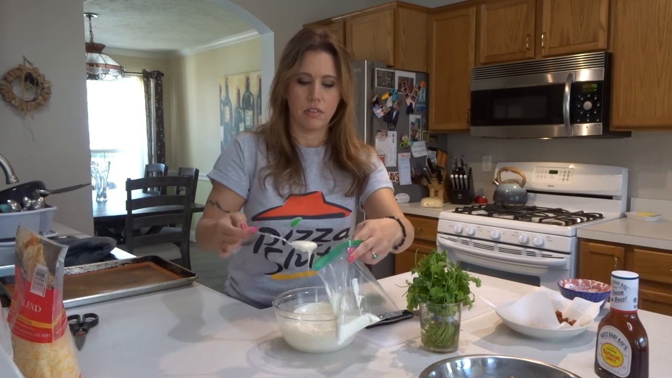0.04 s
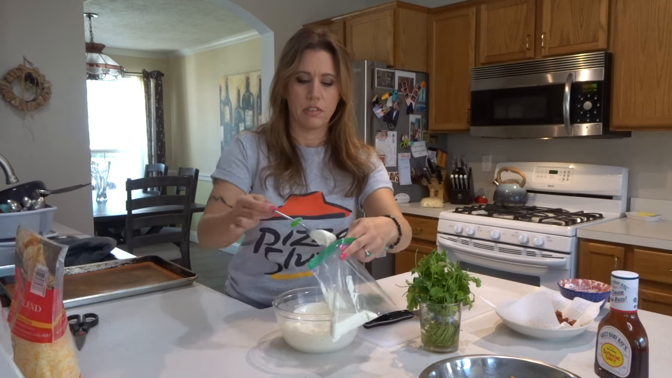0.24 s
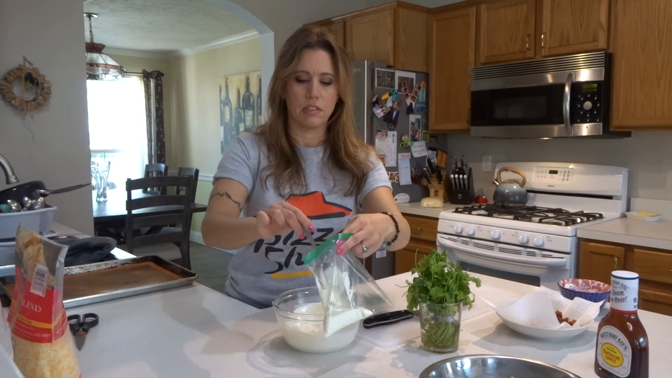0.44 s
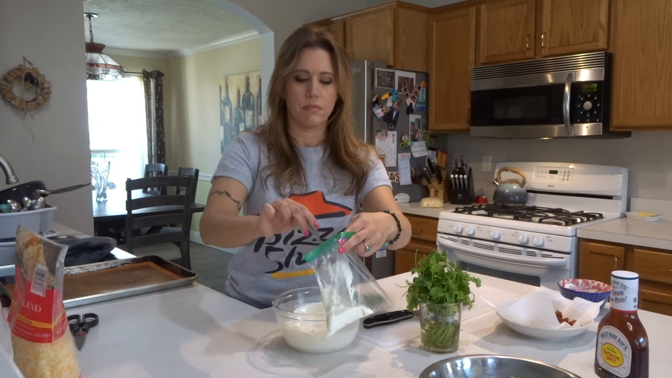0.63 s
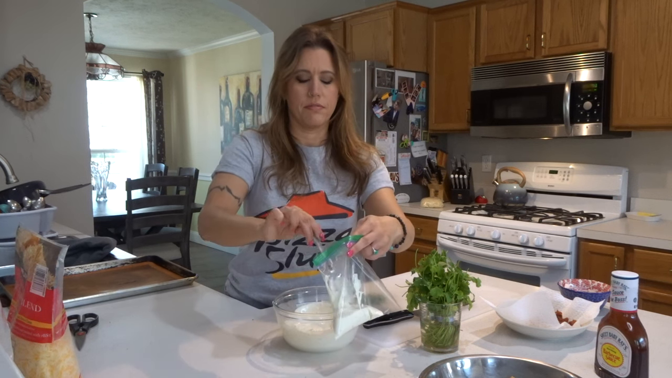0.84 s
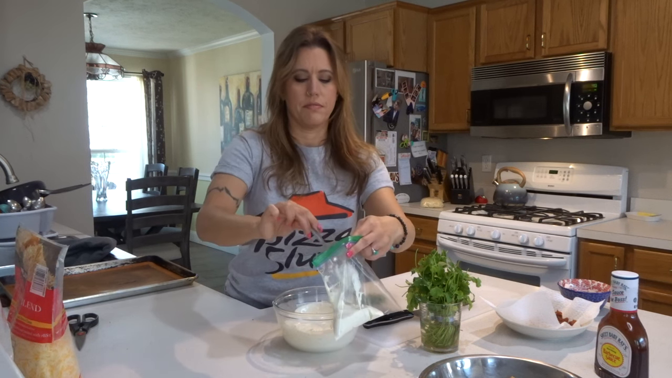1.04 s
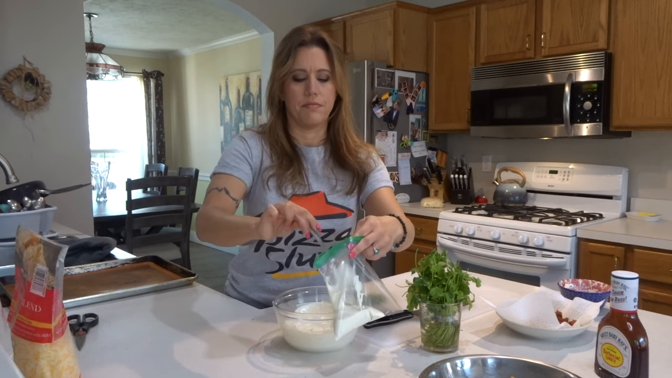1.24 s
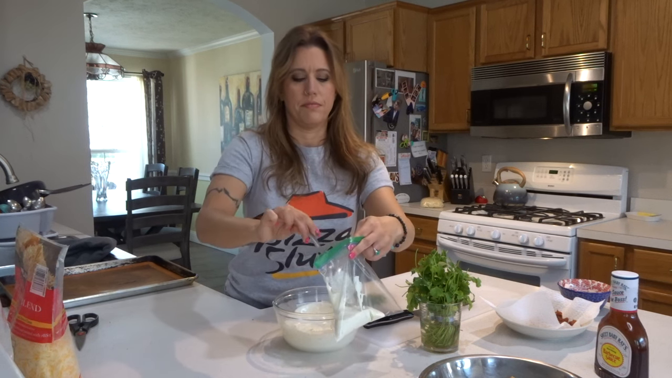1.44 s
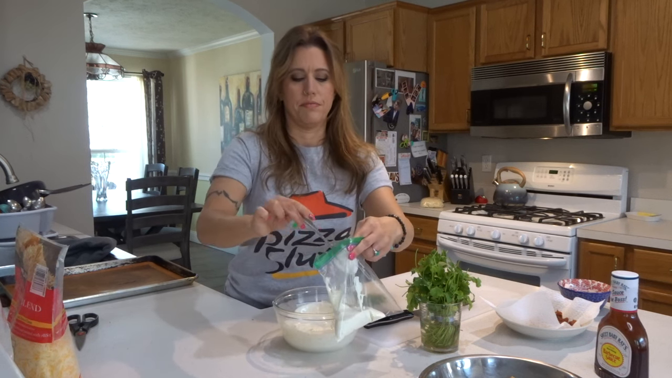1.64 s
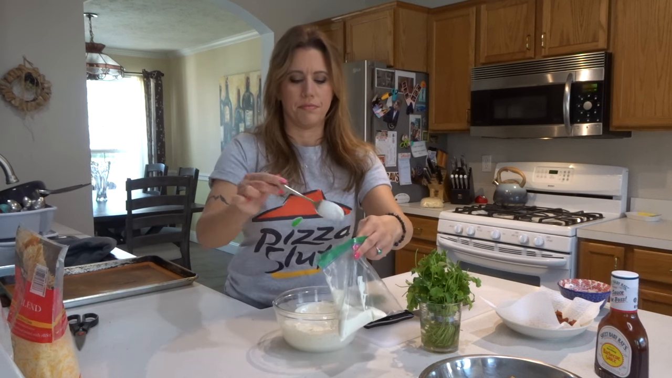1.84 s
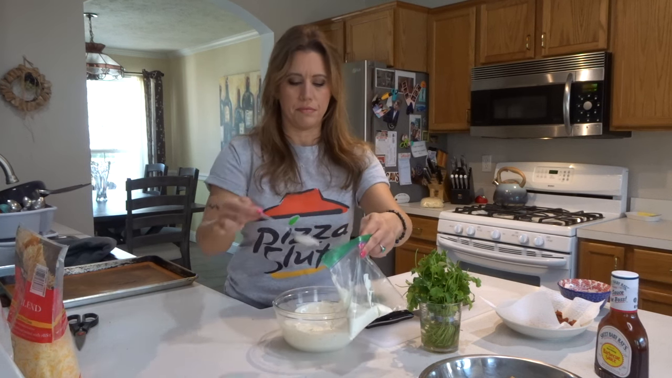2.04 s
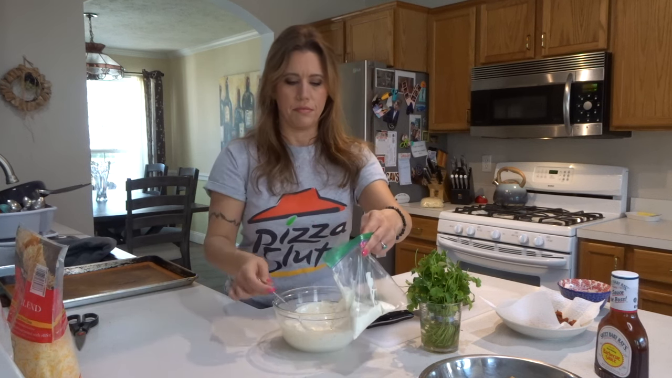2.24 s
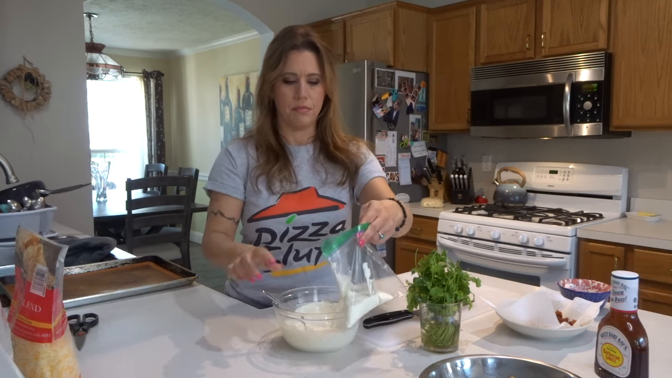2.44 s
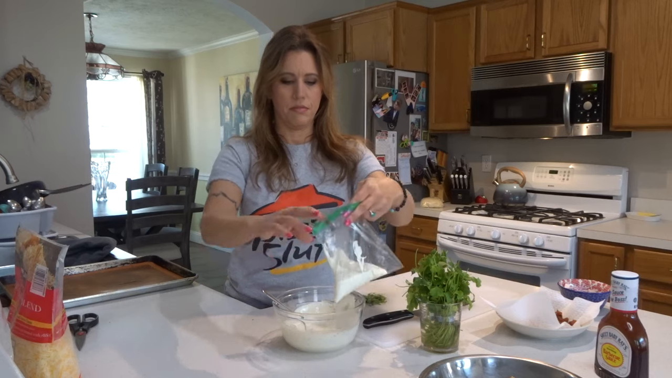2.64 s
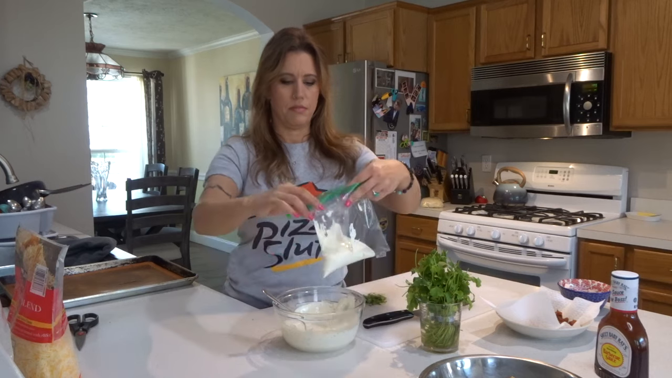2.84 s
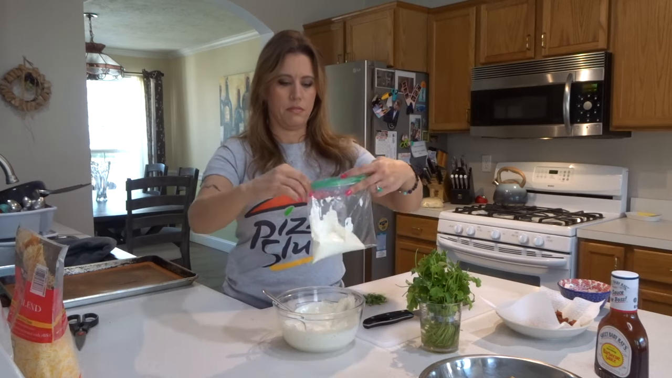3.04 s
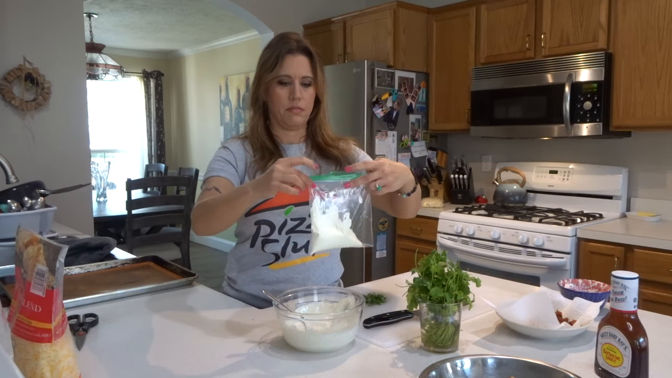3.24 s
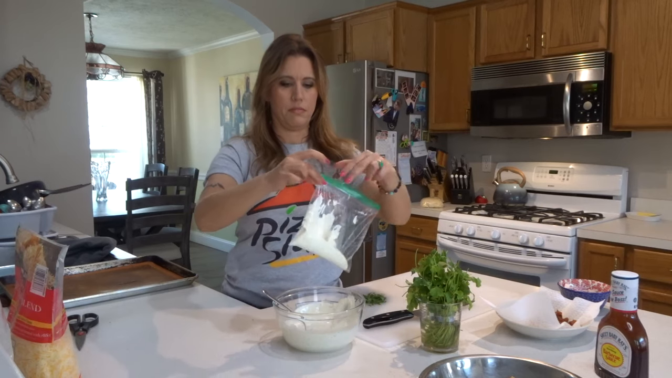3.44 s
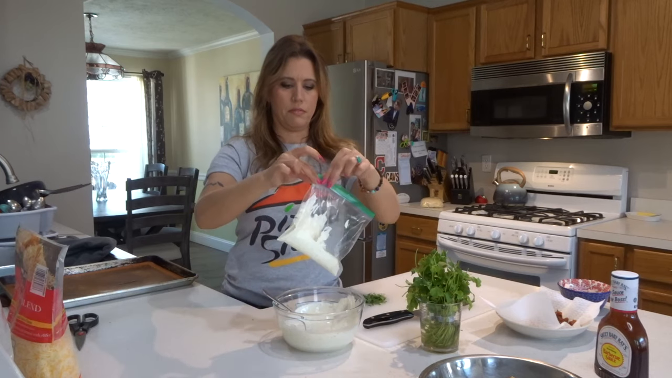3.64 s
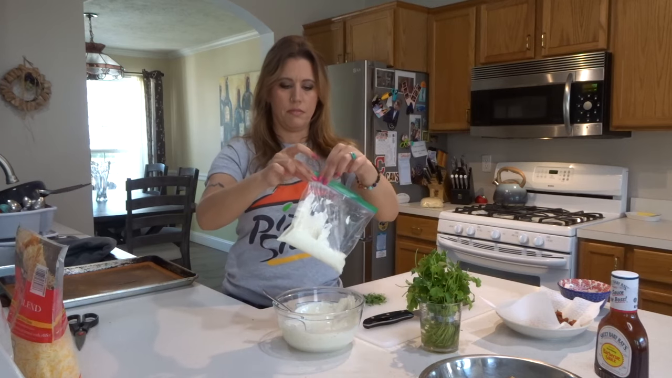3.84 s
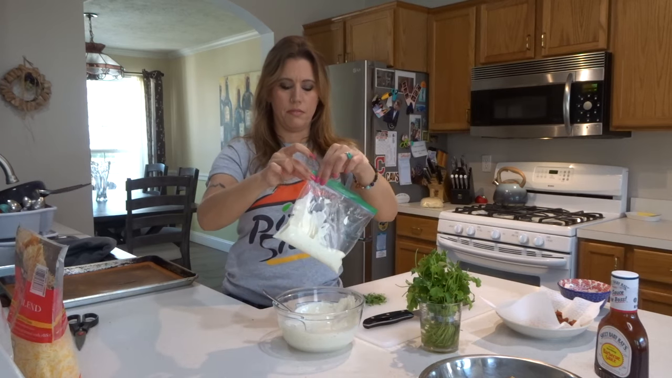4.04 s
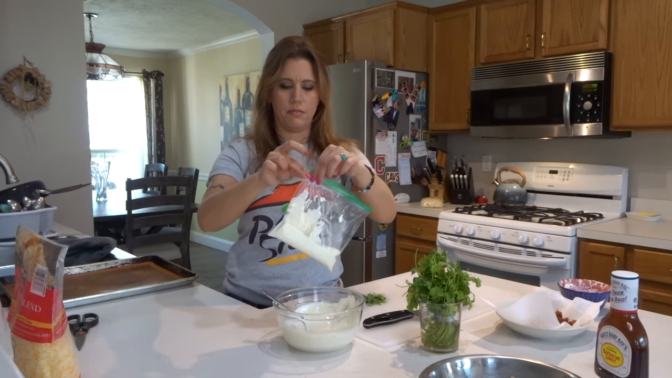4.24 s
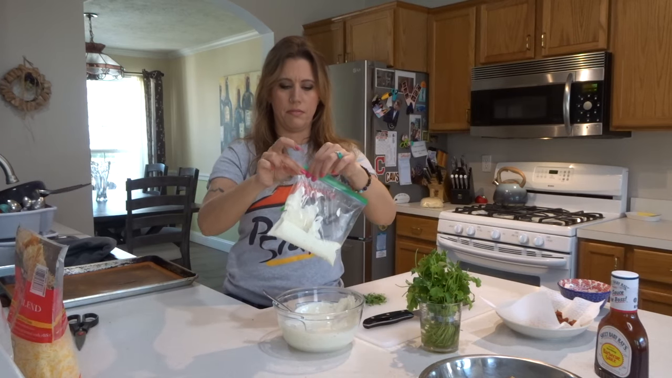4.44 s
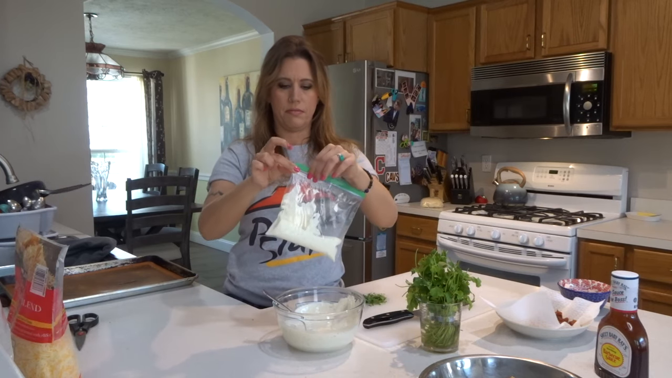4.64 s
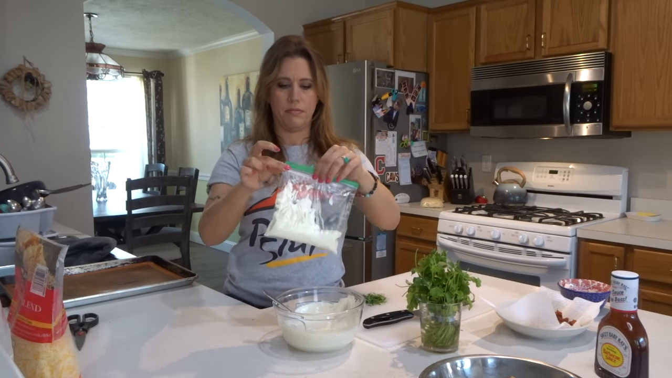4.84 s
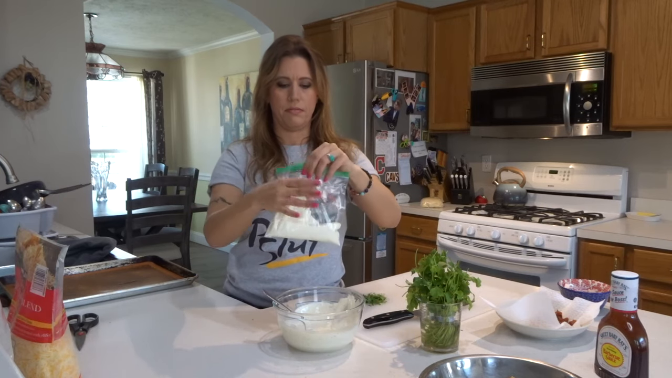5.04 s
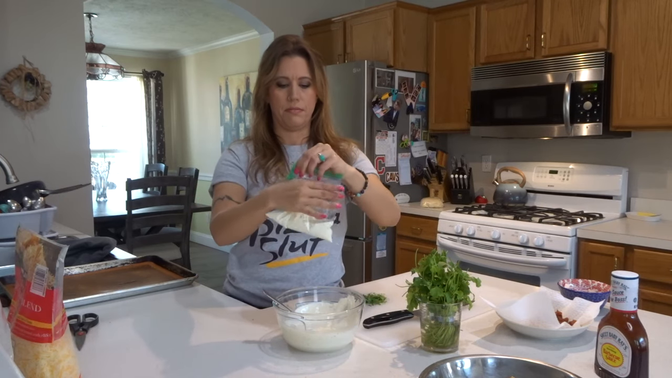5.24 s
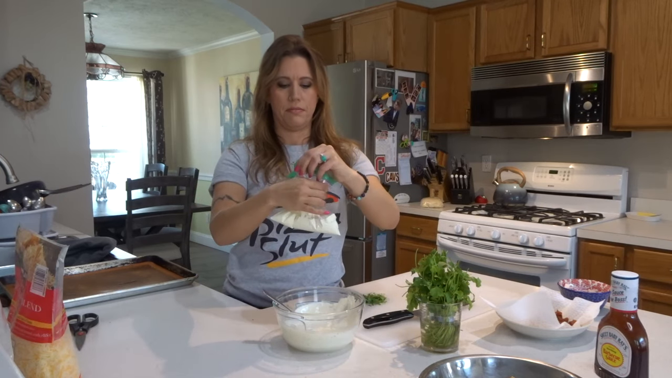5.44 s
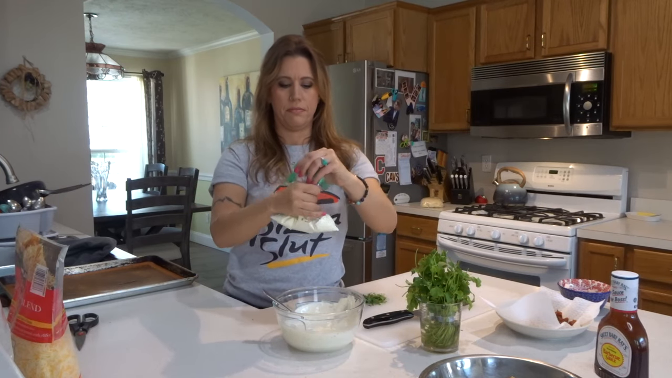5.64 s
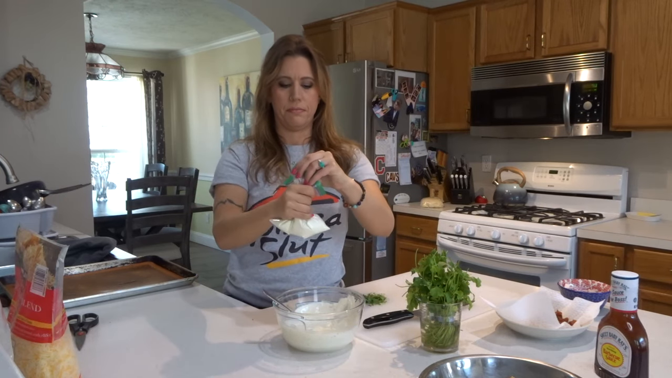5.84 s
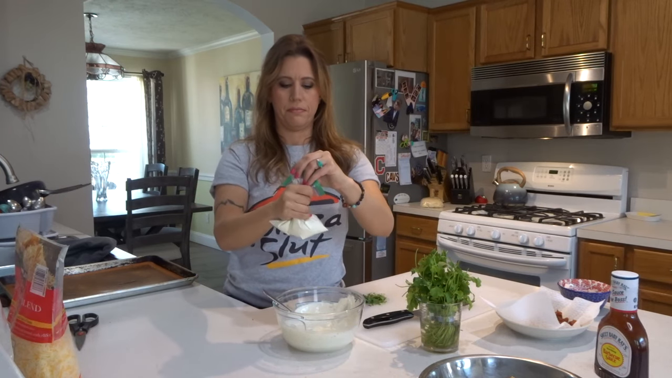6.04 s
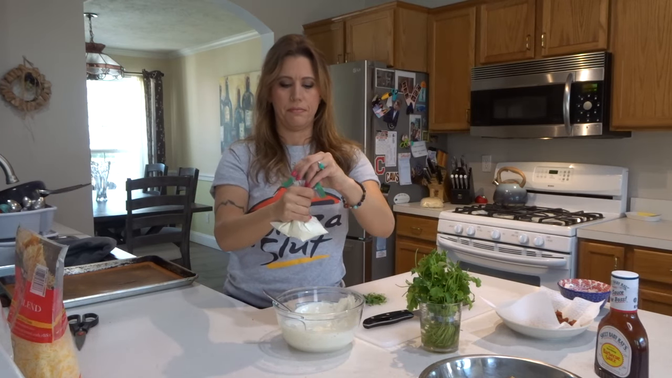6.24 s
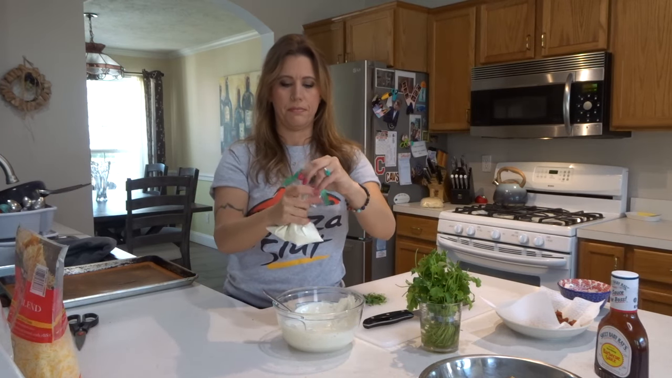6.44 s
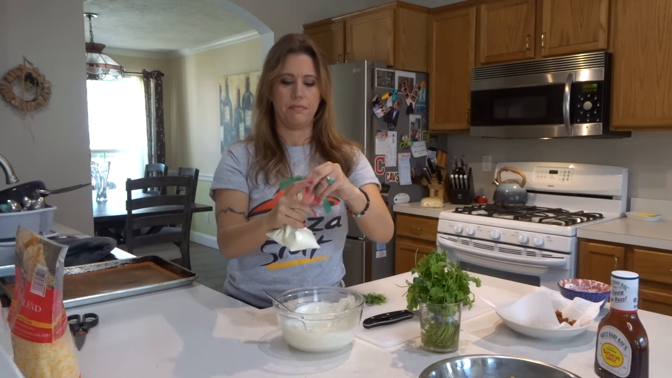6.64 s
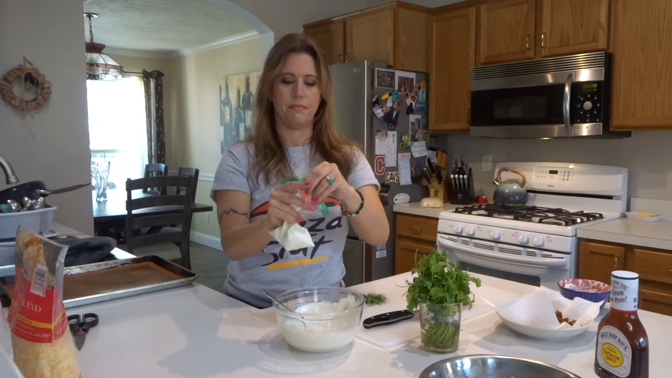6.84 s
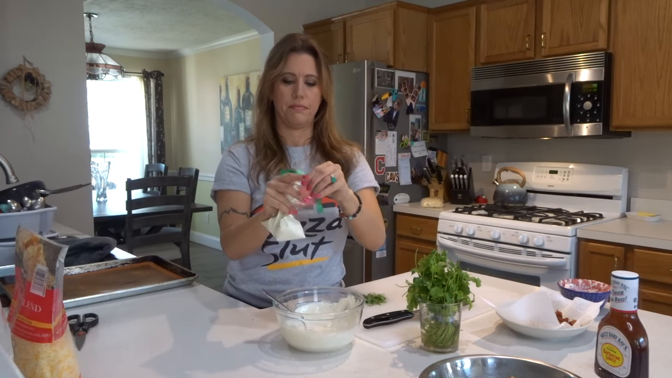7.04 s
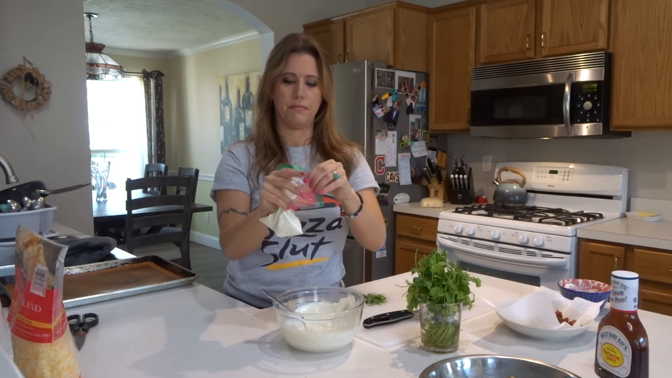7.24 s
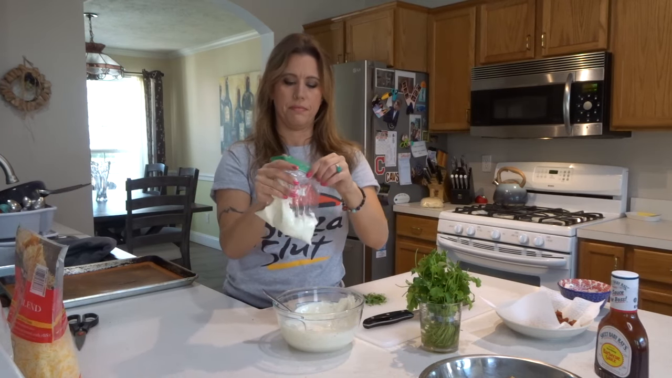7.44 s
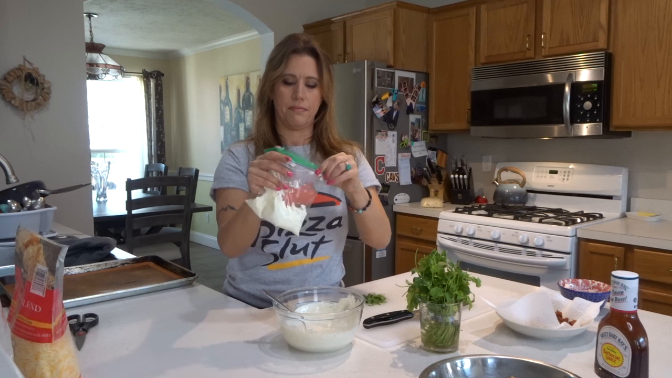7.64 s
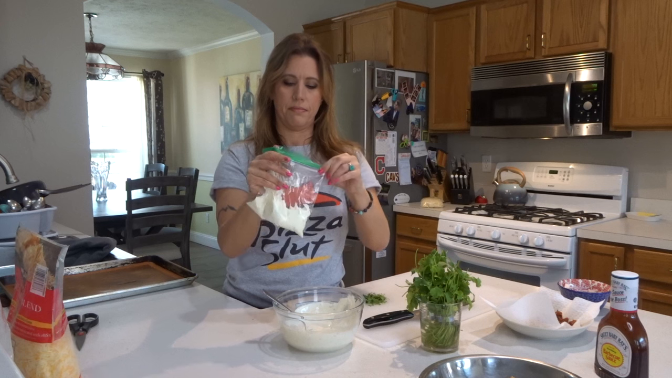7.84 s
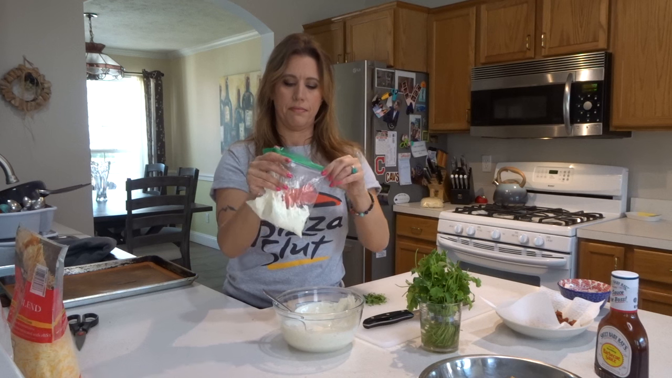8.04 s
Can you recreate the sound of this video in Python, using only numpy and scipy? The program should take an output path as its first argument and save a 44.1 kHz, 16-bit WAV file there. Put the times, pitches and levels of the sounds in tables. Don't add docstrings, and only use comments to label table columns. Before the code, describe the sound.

Quiet kitchen hum with faint plastic ticks, one bright spoon clatter, then crisp bursts of plastic bag crinkling as it is closed and squeezed.

```python
import sys
import numpy as np
from scipy import signal
from scipy.fft import rfft, irfft, next_fast_len
from scipy.io import wavfile
from scipy.ndimage import uniform_filter1d, map_coordinates

SR = 44100
rng = np.random.default_rng(int(sys.argv[2]) if len(sys.argv) > 2 else 0)


def voltage_ratio(decibels):
    exponent = np.asarray(decibels, float) / 20
    return 10 ** exponent


def unload_wav(signal):
    wavfile.write(
        sys.argv[1],
        SR,
        np.round(np.clip(np.atleast_2d(signal).T, -1, 1) * 32767).astype(np.int16),
    )


N = 357385

# start_s, peak_db, panel_hz, brightness_db
CREASE_SNAPS = [(.384, -45, 2360, -8), (.3995, -34, 2500, -19), (.4045, -38, 3300, -17),
                (.41, -37, 3000, -22), (.417, -37, 1780, -23), (.433, -42, 2700, -25),
                (.7173, -41, 2520, -2), (.854, -41, 2920, -9), (.9987, -41, 2410, -27),
                (1.03, -40.5, 2050, -27), (1.1524, -43, 1720, -18), (1.233, -40.5, 2680, -28),
                (1.8427, -41.5, 3300, -27), (3.5815, -39, 2160, -22), (3.6208, -38, 2200, -9),
                (3.7187, -32, 2310, -3), (4.0586, -43, 3510, -1), (4.148, -39, 2200, -3),
                (4.1887, -40, 3310, -19), (4.2103, -26, 4000, 0), (4.2118, -14, 3240, -1),
                (4.2165, -29.5, 1960, -15), (4.5776, -43, 2560, -21), (4.657, -44, 2500, -19),
                (4.68, -42, 3300, -24), (4.7226, -38, 3330, -33), (4.7422, -40, 3200, -19),
                (4.826, -40, 3000, -18), (4.7586, -34, 4420, -31), (4.7937, -32, 2820, -25),
                (4.8071, -35, 3230, -23), (4.937, -35, 1880, -15), (6.0175, -42.5, 5200, -10),
                (6.025, -47, 3700, -15), (6.162, -43, 2800, -27), (3.6, -37.5, 2250, -25),
                (3.64, -43, 2200, -25), (7.8228, -21, 3000, 7), (7.6336, -29, 3270, -23),
                (8.0898, -32, 3370, -14)]
# start_s, peak_db, panel_hz, brightness_db
LIFT_SNAPS = [(2.66, -28, 3300, -29), (2.7365, -30, 1900, -27), (2.761, -30, 3200, -20),
              (2.812, -28, 3000, 5), (2.8365, -28, 4960, -8), (2.9, -26, 2700, 5), (2.908, -22, 2500, -5),
              (3.241, -32, 2990, -14), (3.258, -30, 3250, -17), (2.675, -22, 3180, -15),
              (2.6912, -28.5, 1680, -20), (2.748, -11.5, 2380, -19), (2.778, -21.5, 2900, -4),
              (2.819, -19.5, 2700, -4), (2.8505, -20, 2900, -7), (2.8848, -13, 3420, -22),
              (2.8934, -13, 2070, -4), (2.983, -22, 3300, 0), (3.046, -27, 4340, -2),
              (3.112, -34, 3070, -10), (3.1815, -22, 3330, -6), (3.2724, -28, 3370, -17),
              (3.283, -30, 2800, -14), (3.3367, -34, 3820, -20), (3.55, -37, 3630, -25)]
# start_s, peak_db, panel_hz, brightness_db
FOLD_SNAPS = [(5.0141, -25.5, 2600, -5), (5.0184, -25, 1740, -9), (5.0445, -31, 3140, -4),
              (5.058, -26, 2480, -10), (5.097, -28, 2400, -11), (5.1894, -29.5, 2880, -7),
              (5.2305, -23.5, 2900, -1), (5.241, -30, 3600, -7), (5.312, -15.5, 4300, -5),
              (5.4415, -28, 6460, 1), (5.5014, -30, 4500, -8), (5.5335, -27, 5300, -8),
              (5.578, -21.5, 2980, -1), (5.589, -30, 2300, -5), (5.612, -29, 4300, -15),
              (5.624, -23, 2900, 5), (5.637, -25.5, 1980, -12), (5.71, -27.5, 4300, -4),
              (5.047, -24, 2400, 10), (5.064, -19, 2380, -16), (5.0756, -16.5, 2460, -7),
              (5.221, -22, 2590, -1), (5.315, -22, 4200, 3), (5.3367, -22.5, 3520, 16),
              (5.466, -32, 6000, 5), (5.6292, -24.5, 4300, -2), (5.214, -22.5, 3460, 1),
              (5.2485, -21.5, 3580, -5), (5.2999, -18, 4280, -11), (5.3601, -13, 2520, -4),
              (5.49, -15, 4970, -30), (5.5741, -19, 4100, -2), (5.68, -22.5, 3380, -6),
              (5.785, -28, 2800, 4)]
# start_s, peak_db, panel_hz, brightness_db
SQUEEZE_SNAPS = [(6.3766, -18.5, 3840, -1), (6.4628, -23, 3080, -2), (6.6726, -22, 5000, -8),
                 (6.709, -26, 3530, -12.5), (6.7566, -18, 2940, 7), (7.3012, -21, 3340, -11),
                 (7.3867, -17, 3380, -9), (7.4215, -13, 3800, -13), (7.532, -28, 3150, -24),
                 (6.2555, -36, 1600, 0), (6.299, -33, 3470, 5), (6.3218, -25, 3560, -3),
                 (6.33, -26, 3400, -3), (6.414, -32, 1790, -5), (6.502, -25, 3000, -18),
                 (6.516, -25, 3200, -9), (6.562, -32, 2580, -7), (6.637, -24.5, 2920, -2),
                 (6.666, -23.5, 2600, -15), (6.7, -25, 3300, -15), (6.7435, -18, 2390, -2),
                 (6.842, -28, 2700, -12), (7.1395, -30, 2950, -7), (7.337, -25, 2000, -3),
                 (7.344, -23, 3330, -10), (7.406, -18, 3800, -3), (7.59, -25, 3000, 9),
                 (7.613, -22.5, 2600, -13), (7.673, -29.5, 1890, -19), (6.261, -22, 4750, -29),
                 (6.336, -20.5, 3400, -2), (6.4218, -22.5, 3640, -23), (6.4891, -13.5, 3150, -7),
                 (6.5315, -23, 3080, -15), (6.5799, -15, 3100, -2), (6.7305, -19, 3700, 0),
                 (6.7698, -13, 3580, -14), (6.819, -18, 2450, -4.5), (6.8629, -27, 2460, -29),
                 (7.065, -19.5, 3520, -17), (7.1116, -16.5, 4380, -10), (7.15, -24, 2550, -10),
                 (7.197, -26, 3580, -2), (7.2432, -22, 3020, -3), (7.285, -14, 3240, -16),
                 (7.36, -15.5, 2870, -2), (7.4983, -22, 2280, -7), (7.553, -14, 3300, 7.5),
                 (7.559, -23, 7000, 3), (7.5739, -23, 2840, -25)]
# start_s, crinkle_db, hold_s
GRIP_EVENTS = [(0.392, -61.5, 0.032), (2.73, -56, 0.011), (2.794, -49, 0.024), (2.874, -42.5, 0.044),
               (3.11, -50.5, 0.055), (3.247, -46.5, 0.028), (3.581, -58.5, 0.084), (4.608, -65, 0.32),
               (5.022, -48, 0.075), (5.201, -51.5, 0.084), (5.306, -47.5, 0.072), (5.434, -51, 0.12),
               (5.58, -43.5, 0.011), (5.624, -44, 0.024), (5.67, -51.5, 0.13), (6.315, -48.5, 0.033),
               (6.348, -47.5, 0.026), (6.396, -48.5, 0.28), (6.643, -46.5, 0.031), (6.701, -45.5, 0.096),
               (6.805, -57, 0.1), (7.127, -48, 0.017), (7.21, -54, 0.14), (7.324, -53, 0.024),
               (7.359, -37, 0.044), (7.458, -49, 0.097), (7.59, -47, 0.018), (7.628, -59.5, 0.079)]
# freq_hz, density_db_per_hz
FILM_COLOUR = [(290, -40), (500, 4), (914, -3), (1160, -6), (1510, 1.5), (3400, 2), (5810, -4.5),
               (9570, -8), (11100, -9.5), (11500, -55), (15000, -62), (22000, -120)]
# start_s, level_db, length_ms
BAG_THUMPS = [(.399, -42, 86), (2.75, -50, 37), (2.89, -36, 33), (5.076, -43, 23), (5.359, -31, 19),
              (6.49, -41, 14), (4.21, -40, 6.6), (7.36, -32, 54), (7.391, -40, 44), (7.42, -36, 42),
              (7.497, -37, 23)]
# start_s, low_modes_db, high_modes_db, knock_db
SPOON_HITS = [
    (2.2875, -37, -47, -18),
    (2.2926, -46, -30, -20),
    (2.2959, -43, -25.5, -16.5),
    (2.3017, -22.5, -26, -23.5),
    (2.313, -53, -43, -27),
    (2.329, -58, -38, -25),
    (2.345, -60, -36, -30),
]
# freq_hz, level_db, t60_s
LOW_MODES = [(1516, -20, .3), (1574, -6, .3), (1591, -11, .3), (2796.3, -6, .9), (2809.2, -5, .9),
             (2802, 3, .13), (2780, -16, .4), (2843, -17, .3), (2918, -17, .4), (3144, -18, .4),
             (3290, -15, .4)]
# freq_hz, level_db, t60_s
HIGH_MODES = [(3780, -12, .45), (3919, -14, .35), (4244, -7, .35), (4290, -1, .45), (4302, 0, .58),
              (4322, 3, .09), (4362, -10, .5), (4511, -14, .35), (5857, -12, .15), (6141, -14, .38),
              (6179, -16, .35), (6153, -10, .4), (6500, -8, .05), (10670, -19, .3)]
# freq_hz, density_db_per_hz
KNOCK_COLOUR = [(85, -27), (110, -8), (150, -4), (250, -4), (380, -1.5), (465, -11), (580, -4.5),
                (750, -6.5), (1050, -15.5), (1250, -16.5), (1900, -14), (3500, -8.5), (4500, -3.5),
                (5100, -24), (6200, -12.5), (7700, -29.5), (10600, -16), (12000, -50)]
# delay_s, level_db
EARLY_ECHOES = [(.0011, -14), (.0023, -16), (.0041, -7), (.0056, -14), (.0068, -14), (.0095, -18),
                (.013, -16), (.021, -21)]
# freq_hz, t60_s
WALL_DECAY = [(150, 0.48), (800, 0.89), (2500, 0.6), (6000, 0.59), (11000, 0.38)]
# freq_hz, left_right_likeness
WALL_LIKENESS = [(200, 0.99), (1000, 0.87), (3000, 0.55), (10000, 0.011)]
# freq_hz, density_db_per_hz
AIR_COLOUR = [(15, -37), (25, -15), (117, -5), (173, -4.5), (248, -1), (565, -9.5), (810, -16.5), (945, -9),
              (1320, -18.5), (2100, -18.5), (4000, -23), (4320, -28.5), (5040, -25.5), (10600, -34.5),
              (11800, -76), (15300, -91), (22000, -120)]
# freq_hz, level_db, width_hz
HUM_TONES = [(122.2, -65.5, 9.6), (251.2, -63, 26), (315.1, -64.5, 23), (395.5, -66.5, 26),
             (563.3, -68.5, 4.2), (667.3, -71.5, 14), (4430, -74.5, 300), (6300, -79.5, 180),
             (10790, -82.5, 86)]
# freq_hz, left_right_likeness
AIR_LIKENESS = [(60, 0.96), (170, 0.98), (490, 0.85), (1410, 0.23), (4030, 0.19), (11500, 0.012)]

SNAP_MS, SNAP_SCATTER_DB, SHORTEST_MS = 2.8, 2.5, 0.9
LOUD_DB, SHORTEN_DB_PER_DB = -23.5, 0.43
PANEL_WIDTH, PANEL_RING_WIDTH, PANEL_RING_GAIN = 1.1, 0.2, 0.8
LESSER_OVER_GRIP_DB, LESSER_SCATTER_DB = 11, 3
LESSER_HZ, LESSER_OCTAVES, LESSER_BRIGHT_DB = 3300, 0.88, -10
TIGHTEN_DB_PER_S, RELAX_DB_PER_S = 700, 402
IDLE_DB, LIFTED_S, SHEEN_DB = -72.5, 2.4, 7
LOW_SETTLE_S, HIGH_SETTLE_S, SETTLE_DB_PER_S = 2.515, 2.655, 350
KNOCK_T60_S = 0.022
ECHO_SKEW = 0.14
AIR_DB = -52.5


def snaps(size=2048):
    events = np.vstack([CREASE_SNAPS, LIFT_SNAPS, FOLD_SNAPS, SQUEEZE_SNAPS, lesser_snaps()])
    start_s, peak_db, panel_hz, bright_db = events.T[..., None]
    scatter_db = SNAP_SCATTER_DB * rng.standard_normal(start_s.shape)
    length_ms = SNAP_MS * voltage_ratio(scatter_db - SHORTEN_DB_PER_DB * np.maximum(peak_db - LOUD_DB, 0))
    f = np.fft.rfftfreq(size, 1 / SR)
    luck = rng.standard_normal((len(start_s), 2 * size))
    cracks = rfft(burst(luck, np.clip(length_ms - 0.8, SHORTEST_MS, 5)))
    cracks /= uniform_filter1d(np.abs(cracks), size=14, axis=1) ** 0.49

    panel = peak(f, panel_hz, PANEL_WIDTH * panel_hz) ** 2
    panel = panel + PANEL_RING_GAIN * peak(f, panel_hz, PANEL_RING_WIDTH * panel_hz)
    body = irfft(cracks * panel * peak(f, 1850, 5600) ** 2)

    bands = uniform_filter1d(rng.standard_normal(cracks.shape), size=60, axis=1)
    cracks *= voltage_ratio(1.1 * unit(bands))
    edge = irfft(cracks * peak(f, 6960, 5600) * peak(f, 6100, 8100))

    rows = peak_one(even(body) - voltage_ratio(bright_db) * even(edge))
    return place(np.maximum(start_s[:, 0] - 0.006, 0), voltage_ratio(peak_db - 3.0) * rows)


def lesser_snaps(count=320):
    luck = rng.standard_normal((count, 3))
    start_s = (np.arange(count) + rng.random(count)) * N / SR / count
    peak_db = grip_db(start_s) + LESSER_OVER_GRIP_DB + LESSER_SCATTER_DB * luck[:, 0]
    panel_hz = LESSER_HZ * 2 ** (LESSER_OCTAVES * luck[:, 1])
    bright_db = LESSER_BRIGHT_DB + 6 * luck[:, 2]
    return np.transpose([start_s, peak_db, panel_hz, bright_db])


def grip_db(times_s):
    start_s, level_db, hold_s = np.transpose(GRIP_EVENTS)[..., None]
    swell_db = TIGHTEN_DB_PER_S * np.maximum(start_s - times_s, 0)
    relax_db = RELAX_DB_PER_S * np.maximum(times_s - start_s - np.abs(hold_s), 0)
    each_db = level_db - swell_db - relax_db
    return np.maximum(each_db.max(axis=0), np.where(times_s > LIFTED_S, IDLE_DB, -120))


def crinkle(count=20000, size=128):
    luck = rng.random((count, 5))
    times_s = luck[:, 0] * N / SR
    field = rng.standard_normal((400, 1)) + 0.22 * rng.standard_normal((400, 7))
    clump = map_coordinates(field, [times_s * 40, luck[:, 1] * 6])
    hz = 900 * 13 ** luck[:, 1:2]
    t = np.arange(size) / SR
    strength_db = np.minimum(-3.5 * np.log(luck[:, 2:3]), 14)
    strength_db = strength_db + 3.5 * np.clip(clump, -3, 2)[:, None]
    grains = voltage_ratio(strength_db - 60 * t * hz / 7) * np.sin(2 * np.pi * (hz * t + luck[:, 3:4]))
    colour = lambda f: voltage_ratio(along(FILM_COLOUR, f)) * np.sqrt(f / 3000)
    film = unit(filtered(place(times_s, grains), colour))
    sheen = filtered(film, lambda f: peak(f, 8960, 7400))
    return voltage_ratio(grip_db(np.arange(N) / SR)) * (film + (voltage_ratio(SHEEN_DB) - 1) * sheen)


def thumps(size=4096):
    start_s, level_db, length_ms = np.transpose(BAG_THUMPS)[..., None]
    push = rfft(burst(rng.standard_normal((len(start_s), 2 * size)), length_ms / 4))
    air = irfft(push * peak(np.fft.rfftfreq(size, 1 / SR), 380, 450) ** 2)
    return place(start_s[:, 0] - 0.004, voltage_ratio(level_db) * peak_one(air))


def spoon():
    rings, knocks = np.zeros((2, N)), np.zeros(N)
    t = np.arange(SR * 2 // 3) / SR
    knock_t = t[:SR // 8]
    colour = causal(KNOCK_COLOUR)
    low, high = struck(LOW_MODES, t), struck(HIGH_MODES, t)
    for start_s, low_db, high_db, knock_db in SPOON_HITS:
        at = round(start_s * SR)
        low_settle = voltage_ratio(-SETTLE_DB_PER_S * np.maximum(start_s + t - LOW_SETTLE_S, 0))
        high_settle = voltage_ratio(-SETTLE_DB_PER_S * np.maximum(start_s + t - HIGH_SETTLE_S, 0))
        ring = voltage_ratio(low_db) * low * low_settle + voltage_ratio(high_db) * high * high_settle
        rings[:, at:][:, :len(t)] += ring
        noise = rng.standard_normal(len(knock_t)) * voltage_ratio(-60 * knock_t / KNOCK_T60_S)
        knock = np.convolve(noise, colour)
        knocks[at:][:len(knock)] += voltage_ratio(knock_db) * knock
    return rings, knocks


def struck(modes, t):
    hz, level_db, t60_s = np.transpose(modes)[..., None]
    lobes = 0.4 * rng.standard_normal((len(hz), 1)) * [[[1]], [[-1]]]
    phase = lobes + np.pi * np.arange(len(hz))[:, None]
    onset = 1 - np.exp(-t / 0.00051)
    return (voltage_ratio(level_db - 60 * t / t60_s) * np.sin(2 * np.pi * hz * t + phase) * onset).sum(axis=1)


def early_echoes(x):
    skew = 1 + ECHO_SKEW * np.array([[1], [-1]])

    def response(f):
        return 1 + sum(voltage_ratio(level_db) * np.exp(-2j * np.pi * f * delay_s * skew)
                       for delay_s, level_db in EARLY_ECHOES)
    return filtered(x, response)


def walls(x, block_s=0.3):
    out = np.zeros((2, N + 2 * SR))
    step, length = int(block_s * SR), SR * 3 // 4
    for start in range(0, N, step):
        hz, t, z = signal.stft(rng.standard_normal((2, length)), SR, nperseg=256)
        decay = voltage_ratio(-60 * t / along(WALL_DECAY, hz)[:, None])
        tail = signal.istft(z * decay, SR, nperseg=256)[1]
        tail = tail / np.linalg.norm(tail[0])
        wet = signal.fftconvolve(x[None, start:start + step], tail, axes=1)
        out[:, start + 300:][:, :wet.shape[1]] += wet
    return stereo(out[:, :N], WALL_LIKENESS)


def room_tone():
    air = unit(filtered(rng.standard_normal((2, N)), lambda hz: voltage_ratio(along(AIR_COLOUR, hz))))
    air *= voltage_ratio(AIR_DB - 0.5)

    def tone_lines(f):
        return sum(voltage_ratio(level_db) * peak(f, hz, width_hz) ** 2 * np.sqrt(SR / width_hz)
                   for hz, level_db, width_hz in HUM_TONES)
    tones = filtered(rng.standard_normal((2, N)), tone_lines)
    t = np.arange(N) / SR
    drone_db = -58.5 + 1.5 * np.sin(2 * np.pi * 7.3 * t + 2 * np.sin(2 * np.pi * 0.71 * t))
    drone = voltage_ratio(drone_db) * np.sin(2 * np.pi * 54.0 * t + 0.5 * np.sin(2 * np.pi * 1.06 * t))
    whine_phase = 2 * np.pi * 4414 * t + 3 * np.sin(2 * np.pi * 2.1 * t)
    whine = voltage_ratio(-70.5) * np.sin(whine_phase + [[0], [1.2]])
    return whine + stereo(air + tones, AIR_LIKENESS) + drone


def unit(x):
    return x / np.sqrt(np.mean(x ** 2) + 1e-20)


def peak_one(rows):
    return rows / np.abs(rows).max(axis=1, keepdims=True)


def even(rows):
    return rows / np.linalg.norm(rows, axis=1, keepdims=True)


def along(points, hz):
    f, v = np.transpose(points)
    return np.interp(np.log(hz + 1), np.log(f + 1), v)


def filtered(x, response):
    n = x.shape[-1]
    m = next_fast_len(n + SR // 2)
    return irfft(rfft(x, m) * response(np.fft.rfftfreq(m, 1 / SR)), m)[..., :n]


def causal(points, size=2048):
    c = irfft(np.log(voltage_ratio(along(points, np.fft.rfftfreq(size, 1 / SR))) + 1e-6))
    c[1:size // 2] *= 2
    c[size // 2 + 1:] = 0
    h = irfft(np.exp(rfft(c)))
    return h / np.linalg.norm(h)


def peak(f, centre_hz, width_hz):
    return 1j * f * width_hz / (centre_hz ** 2 - f * f + 1j * f * width_hz)


def stereo(pair, alike):
    def turn(hz):
        angle = np.arccos(np.clip(along(alike, hz), -1, 1)) / 2
        return np.array([np.cos(angle), np.sin(angle)])
    mid, side = filtered(pair, turn)
    return np.array([mid + side, mid - side])


def place(times_s, rows):
    at = np.round(times_s * SR).astype(int)[:, None] + np.arange(rows.shape[1])
    return np.bincount(at.ravel(), rows.ravel(), N + SR)[:N]


def burst(luck, length_ms, rise=0.24):
    size = luck.shape[1] // 2
    ms = np.arange(size) / SR * 1000 - 6
    slope = np.where(ms < 0, -1 / rise, 1 / (1 - rise)) / length_ms
    return luck[:, :size] * voltage_ratio(2.97 * luck[:, size:] - 8.1 * ms * slope)


def scene():
    cracks = snaps()
    rustle = crinkle() + thumps()
    rings, knocks = spoon()
    near = early_echoes(rustle + cracks) + knocks
    halo = voltage_ratio(-15) * rings[0]
    wet = walls(voltage_ratio(-3.0) * rustle + voltage_ratio(-6) * cracks + voltage_ratio(4.5) * knocks + halo)
    return near * voltage_ratio([[-0.3], [0.3]]) + rings + wet + room_tone()


def low_pass(x):
    return signal.sosfilt(signal.butter(12, 12120, fs=SR, output="sos"), x)


def record(dry):
    mix = filtered(dry, lambda hz: 1 / (1 + (hz / 11150) ** 90))
    return low_pass(mix)


dry = scene()
out = record(dry)
unload_wav(out)
```